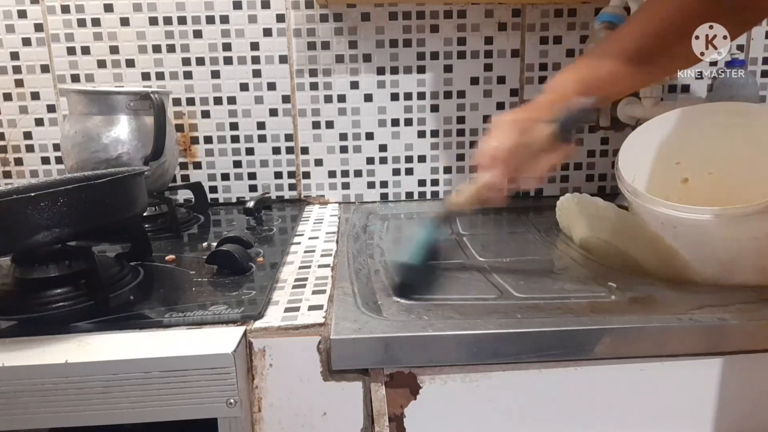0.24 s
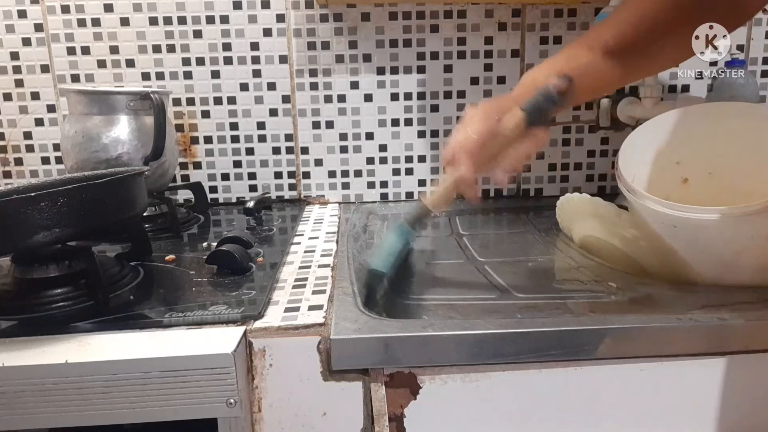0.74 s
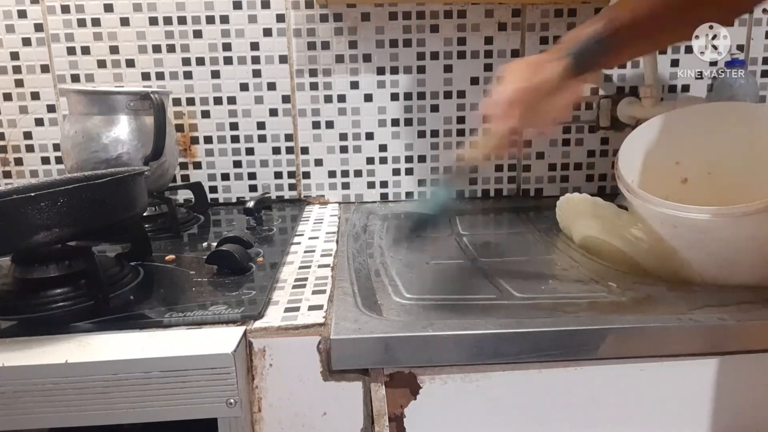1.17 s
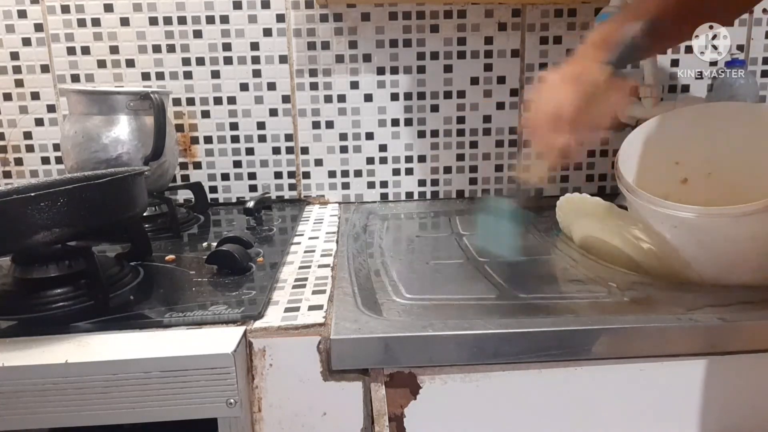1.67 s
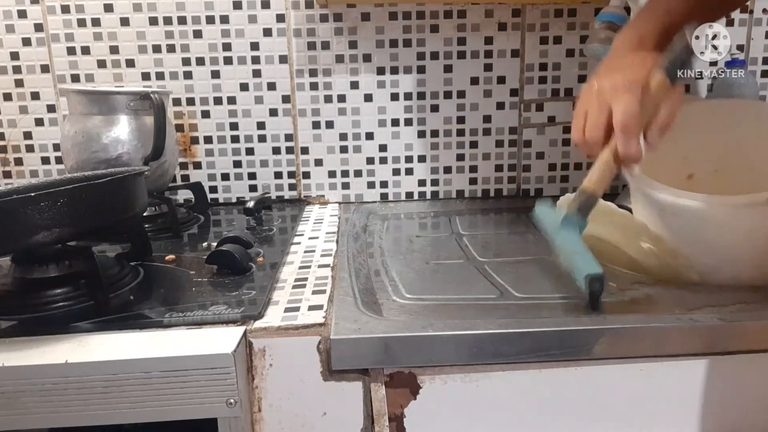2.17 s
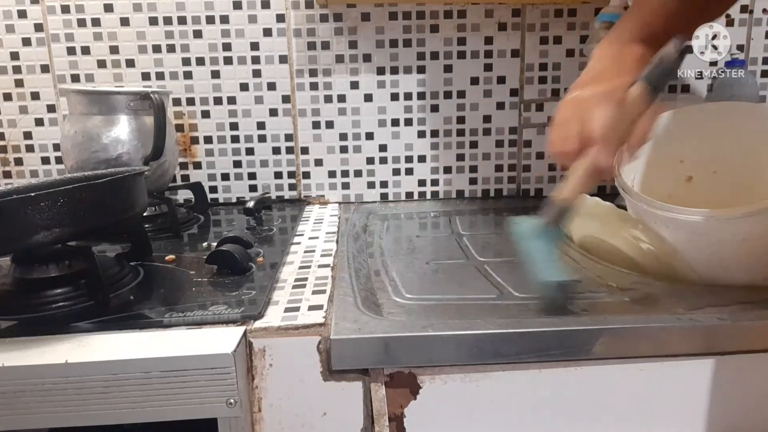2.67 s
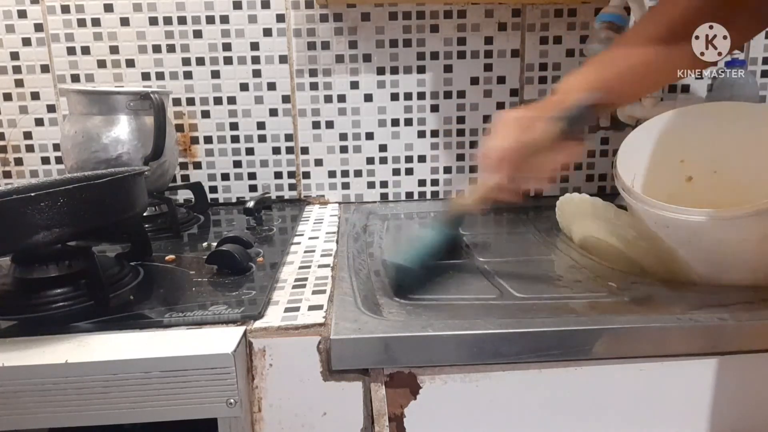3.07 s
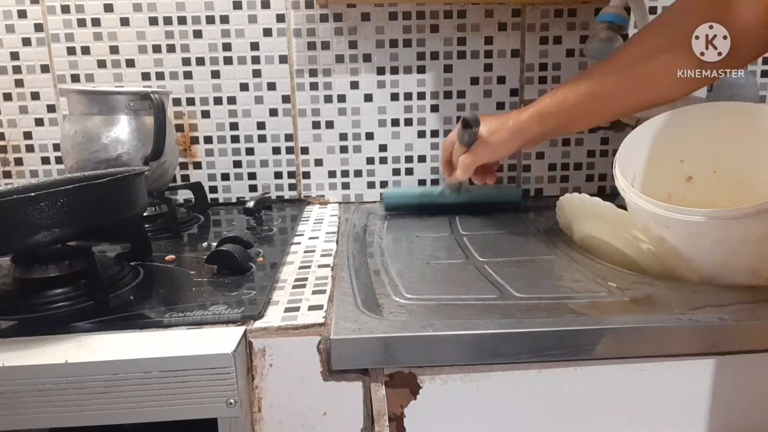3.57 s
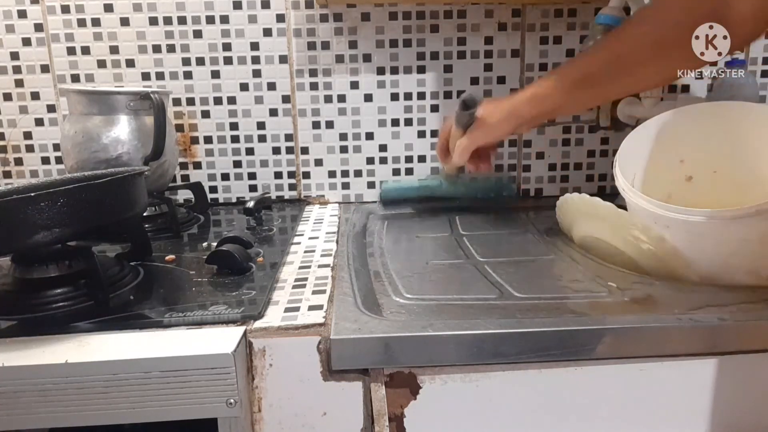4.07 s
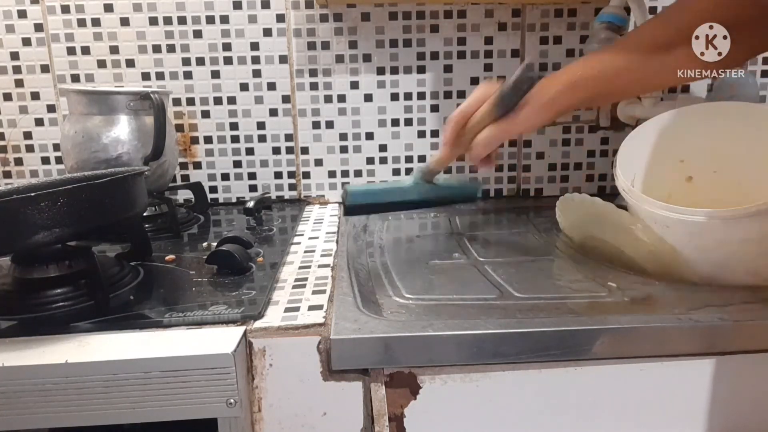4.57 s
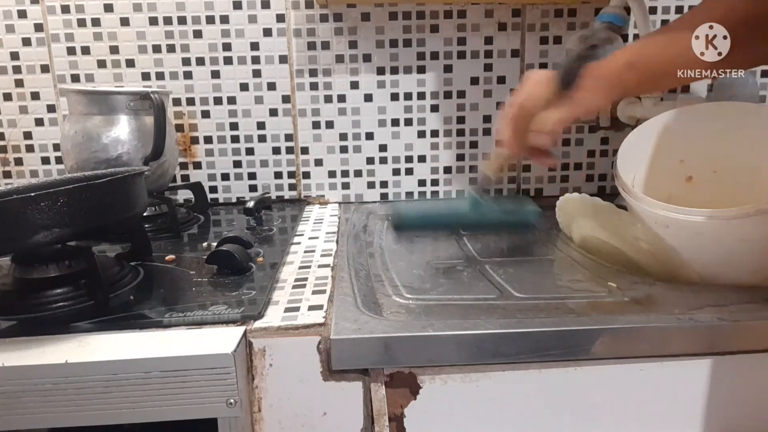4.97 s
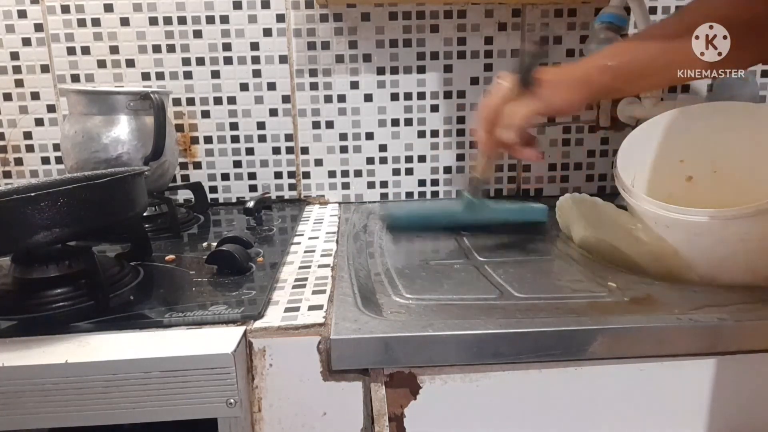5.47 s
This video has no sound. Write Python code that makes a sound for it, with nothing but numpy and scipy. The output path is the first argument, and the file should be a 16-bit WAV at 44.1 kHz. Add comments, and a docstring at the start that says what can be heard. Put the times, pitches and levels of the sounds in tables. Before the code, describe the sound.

A rubber squeegee works over a wet steel drainboard, close to a stereo microphone in a small tiled kitchen with faint hiss. Fizzing water swishes and grainy judder follow each stroke. Short rubbery squeals fall near 0.4, 1.0, 1.6, 2.1 and 2.7 seconds, mostly going from a nasal low note to a higher one, then breaking raggedly and dying away. Soft dull knocks and a low wavering boom of the sheet sit beneath. Small splashes and single chirps join from about 1.4 seconds; a cluster of thuds and heavy shudder comes at 2.3. After a lighter moment around 3, hard bright clacks strike at 3.55 and 3.65, again near 4.2, and at 5.25, with brief metallic ring and short tile echoes. A quick high chirp and strong swish come at 4.75, low rough chirps at 5.3, and a last double knock near 5.7.

```python
"""A rubber squeegee is swept in quick strokes over a wet steel drainboard in a tiled kitchen.
Over a faint room hiss the blade swishes through the water and judders from the start: filtered noise and clicks.
Soft knocks come first, as short damped blows with ringing steel modes, then five gliding stick-slip squeals
above a soft low boom. Splashes and single chirps join from about 1.5 s, and the hardest knocks fall after
3.5 s. Random decaying echoes from the tiles answer the knocks and squeaks."""
import sys
import numpy as np
from scipy import signal
from scipy.fft import rfft, irfft
from scipy.io import wavfile

SR = 44100
rng = np.random.default_rng(int(sys.argv[2]) if len(sys.argv) > 2 else 0)


def unload_wav(signal):
    """Save mono or channel-first audio to the path in sys.argv[1] as 16-bit WAV at rate SR, clipped to [-1, 1]."""
    wavfile.write(
        sys.argv[1],
        SR,
        np.round(np.clip(np.atleast_2d(signal).T, -1, 1) * 32767).astype(np.int16),
    )


N = 253134
TIME = np.arange(N) / SR
EDGE_HZ = 15700  # upper band limit

# likeness of the two channels: (frequency [Hz], likeness [-1 to 1, negative counts as 0])
CHANNEL_LIKENESS = [(100, 0.5), (500, 0.92), (1500, -0.97), (5000, -0.85), (12000, -0.26)]
# strokes of the blade, out and back:
# (fastest [s], speeding up [s], slowing down [s], relative swish level [dB], relative judder level [dB])
STROKES = [ (.02, .2, .25, -74.5, -75), (.405, 0.23, 0.2, -50.5, -39.5), (1.005, .26, 0.16, -51.5, -44.5),
           (1.15, 0.054, 0.14, -64.5, -71), (1.588, 0.23, .2, -49.5, -41.5), (1.723, .12, 0.17, -45, -60.5),
           (1.995, .2, 0.24, -45, -55), (2.135, .15, 0.33, -51, -40), (2.707, 0.19, .14, -53, -38),
           (3.195, .38, 0.14, -55.5, -47), (3.825, .3, 0.14, -51, -44), (4.367, 0.33, 0.26, -50, -43.5),
           (4.66, .3, 0.6, -59.5, -77), (4.776, .045, 0.15, -36.5, -36.5), (4.997, .2, 0.19, -49.5, -65),
           (5.235, .11, 0.26, -51.5, -60.5), (5.41, .25, 0.22, -52, -40.5), (5.538, .15, 0.19, -53.5, -90),
           (5.74, .1, .1, -57, -57)]
# the hand leans on the blade, the sheet flexes and the rubber shudders:
# (time [s], boom level [dB], relative judder level [dB])
FLEXES = [(0.283, -69, -50), (.838, -51.5, -44), (1.442, -56.5, -35.5), (1.905, -52, -53),
          (1.988, -52, -33.5), (2.2, -46.5, -33), (2.3, -51, -25.5), (2.36, -44, -30), (2.568, -49, -33.5),
          (3.039, -55.5, -50), (3.109, -83, -44), (3.256, -54, -53.5), (4.685, -50.5, -30.5),
          (4.73, -68, -34), (4.882, -64.5, -43.5), (4.955, -61.5, -63), (5.675, -54.5, -44.5)]


def amp(db):
    """Decibels to gain."""
    return 10 ** (np.asarray(db) / 20)


def unit(x):
    """Scales to rms 1."""
    return x / np.sqrt(np.mean(x ** 2) + 1e-20)


def read(points, hz):
    """Reads a table on a log-frequency axis."""
    f, value = np.transpose(points)
    return np.interp(np.log(hz + 1), np.log(f + 1), value)


def add(mix, s, sound):
    """Lays a sound into the mix at time s."""
    part = mix[max(round(s * SR), 0):][:len(sound)]
    part += sound[:len(part)]


def colour(x, points):
    """Filters by a table of (frequency [Hz], gain [dB])."""
    gain = amp(read(points, np.fft.rfftfreq(N, 1 / SR)))
    return irfft(rfft(x) * gain, N)


def wander(rate_hz):
    """Smooth random drift of rms 1, with little movement above the given rate."""
    hz = np.fft.rfftfreq(N, 1 / SR)
    lowpass = 1 / (1 + (hz / rate_hz) ** 4)
    return unit(irfft(rfft(rng.standard_normal(N)) * lowpass, N))


def pair(x):
    """Blends two unrelated signals into a left and right that agree most near 500 Hz and not in the treble."""
    a, b = rfft(x)
    same = np.clip(read(CHANNEL_LIKENESS, np.fft.rfftfreq(N, 1 / SR)), 0, 1)
    mid = a * np.sqrt((1 + same) / 2)
    side = b * np.sqrt((1 - same) / 2)
    return irfft(np.array([mid + side, mid - side]), N)


def grains(per_s, spread_db):
    """Two trains of random clicks; positive spread makes a few larger, negative a few smaller."""
    size = amp(spread_db * np.minimum(rng.exponential(1, (2, N)), 4))
    signed = size * rng.choice([-1, 1], (2, N))
    return unit(signed * (rng.random((2, N)) < per_s / SR))


def quiet_room(level_db=-73):
    """The faint hiss of a quiet room is steady noise, strongest in the bass."""
    # room spectrum: (frequency [Hz], relative level [dB per Hz])
    room_spectrum = [(20, -11.5), (85, 6.5), (200, -3.5), (450, -3.5), (1200, -15), (5000, -27.5),
                     (15000, -19)]
    return amp(level_db) * unit(colour(pair(rng.standard_normal((2, N))), room_spectrum))


def speed(fastest, rise_s, fall_s, drop_db=-25, shape=1.24):
    """The blade speeds up and slows down again: 1 at its fastest, drop_db at rise_s before and fall_s after."""
    away = np.maximum((fastest - TIME) / rise_s, (TIME - fastest) / fall_s)
    return amp(drop_db * np.minimum(away, 4) ** shape)  # shape above 1 rounds the top


def burst(s, rise_s, fade_db_per_s):
    """A quick rise at time s and a steady fade in decibels."""
    age = np.maximum(TIME - s, 0)
    return np.minimum(age / rise_s, 1) * amp(-np.minimum(fade_db_per_s * age, 200))


def water_level():
    """The film hisses with the blade's speed, and splashes where the blade lands."""
    # the blade slaps into the water film: (time [s], relative level [dB])
    splash_table = [(1.433, -58), (2.295, -44.5), (2.573, -53), (3.036, -72), (3.547, -84.5),
                    (3.639, -47.5), (4.135, -52.5), (5.258, -47.5), (5.674, -64)]
    parts = [amp(db) * speed(s, rise, fall) for s, rise, fall, db, _ in STROKES]
    parts += [amp(db) * burst(s, rise_s=0.0027, fade_db_per_s=148) for s, db in splash_table]
    return np.sqrt(sum(part ** 2 for part in parts))


def swish(level_db=-1, flutter_db=1, fizz=0.55):
    """The water film tears ahead of the blade in a fizz of tiny bursts."""
    # spectrum of the swish: (frequency [Hz], relative level [dB per Hz])
    swish_spectrum = [(410, -44), (700, -15.5), (945, -11), (1150, -11), (2510, -4.5), (3530, -3),
                      (4760, -3.5), (7130, -3), (8790, -10.5), (13000, -5), (15800, -16.5)]
    film = rng.standard_normal((2, N)) + fizz * grains(per_s=3100, spread_db=2.5)
    film = colour(pair(film), swish_spectrum)
    # the treble of the mid signal sets the reference level
    highpass = signal.butter(4, 5500, "high", fs=SR, output="sos")
    treble = signal.sosfilt(highpass, film.mean(0))
    return film / treble.std() * water_level() * amp(level_db + flutter_db * wander(rate_hz=25))


def sheet_ring():
    """The steel's answer to one blow, with energy 1; neighbouring modes swing in opposite senses."""
    # modes of the drainboard: (frequency [Hz], relative level [dB], t60 [s])
    sheet_modes = [(122, -8.5, 0.18), (160, 0, 0.16), (242, 2, 0.017), (333.1, -14.5, .1),
                   (379.3, -6.5, 0.083), (466, 0.5, 0.14), (508, -2, .1), (602, 5.5, .2), (837, 2.5, .1),
                   (1053, -1.5, 0.19), (1252, -6, 0.061), (1516, -4, .08), (1800, -0.5, .08),
                   (1940, -5.5, 0.13)]
    t = np.arange(SR // 3) / SR
    ring = np.zeros(len(t))
    for k, (hz, db, t60) in enumerate(sheet_modes):
        ring += (-1) ** k * amp(db - 60 * t / t60) * np.cos(2 * np.pi * hz * t)
    return ring / np.linalg.norm(ring)


def drag_level(power=2.1):
    """The rubber drags hardest at the height of a stroke, and shudders when it is leant on."""
    # the power makes judder grow more steeply with speed than the swish does
    parts = [amp(db) * speed(s, rise, fall) ** power for s, rise, fall, _, db in STROKES]
    parts += [amp(db) * burst(s, rise_s=0.009, fade_db_per_s=298) for s, _, db in FLEXES]
    return np.sqrt(sum(part ** 2 for part in parts))


def judder(ring, level_db=-2, sheet_share=.45):
    """The dragging rubber lets go in uneven slips that shake the steel."""
    # spectrum of the slips: (frequency [Hz], relative level [dB per Hz])
    slip_spectrum = [(50, -36), (150, -4), (240, 1), (420, 1), (620, -5.5), (1100, -12), (1800, -14.5),
                     (3600, -15), (6500, -24), (12000, -60)]
    slips = pair(grains(per_s=450, spread_db=-1.0) + 0.31 * rng.standard_normal((2, N)))
    slips = unit(colour(slips, slip_spectrum)) * drag_level()
    rung = signal.oaconvolve(slips, ring[None], axes=1)[:, :N]
    return amp(level_db) * (slips + sheet_share * rung * slips.std() / rung.std())


def knocks(ring, cycles=0.29, rubber_hz=370, ring_db=-9, crack_db=-22, crack_s=0.0053, crack_reach=3):
    """Each blow is a brief damped contact with a wet crack, then the sheet rings on."""
    # blade and frame hit the steel; soft rubber sounds low and hard plastic high:
    # (time [s], peak level of the blow [dB], pitch of the blow [Hz], share of sheet ring [0-1])
    blow_table = [ (.195, -47, 1120, 1), (.599, -53, 6000, .1), (1.0, -33, 330, 1), (1.590, -30, 326, 0.32),
                  (1.992, -28.5, 1110, 1), (2.122, -31.5, 350, .6), (2.204, -26, 352, 1),
                  (2.2985, -20, 2950, 1), (2.304, -20, 377, 1), (2.315, -26.5, 420, 1),
                  (2.358, -27, 1670, 0.28), (2.577, -27, 2800, .95), (2.697, -31.5, 400, 0.51),
                  (3.116, -42.5, 418, 1), (3.5478, -17.5, 816, .41), (3.6392, -12, 3400, 0.13),
                  (3.7058, -27, 790, .17), (3.809, -25.5, 700, .24), (4.1432, -26, 2100, .6),
                  (4.1963, -22, 750, .5), (4.1988, -18, 3200, .1), (4.2424, -15.5, 780, .5),
                  (4.318, -27, 350, 1), (4.6881, -22, 700, 1), (4.733, -22, 543, 0.5),
                  (5.2557, -21.5, 820, 0.28), (5.2583, -10.5, 3150, 0.056), (5.397, -28, 620, .46),
                  (5.6743, -21, 770, 0.64), (5.6755, -22, 3300, 0.46)]
    out, t = np.zeros(N), np.arange(len(ring)) / SR
    for s, db, hz, share in blow_table:
        contact_s = cycles / hz * (1 + (rubber_hz / hz) ** 2)  # soft rubber shudders for longer
        push = np.sin(2 * np.pi * hz * t) * t * np.exp(-t / contact_s)
        blow = -np.gradient(push)  # the air hears the change of the push
        blow /= abs(blow).max()
        # a soft blow reaches only the lower modes and throws a duller spray
        top_hz = min(crack_reach * hz, SR / 2 / np.pi)
        band = signal.butter(2, [hz / 2, top_hz], "band", fs=SR, output="sos")
        spray = unit(signal.sosfilt(band, rng.standard_normal(len(t))))
        crack = amp(crack_db) * spray * np.exp(-t / crack_s)
        rung = signal.lfilter(*signal.butter(2, hz, fs=SR), ring) / abs(ring).max()
        add(out, s, amp(db) * (blow + crack + share * amp(ring_db) * rung))
    return out


def kitchen(x, count=800, slot=20):
    """Dense random echoes off the tiles, different for each channel, each band dying at its own pace."""
    # reverberation: (frequency [Hz], t60 [s])
    tile_decay = [(100, .3), (600, .22), (2500, .26), (14000, .19)]
    taps = np.zeros((2, count * slot))
    at = np.arange(count) * slot + rng.integers(0, slot, (2, count))  # one echo in each slot of samples
    np.put_along_axis(taps, at, rng.choice([-1., 1.], at.shape), 1)
    hz, t, z = signal.stft(taps, SR, nperseg=256)
    same = np.clip(read(CHANNEL_LIKENESS, hz), 0, 1)[:, None] ** 2
    z[1] = same * z[0] + np.sqrt(1 - same ** 2) * z[1]
    decay = amp(-60 * t / read(tile_decay, hz)[:, None])
    tail = signal.istft(z * decay, SR, nperseg=256)[1]
    tail = np.pad(tail / np.linalg.norm(tail[0]), ((0, 0), (60, 0)))  # 60 samples of pre-delay
    return signal.fftconvolve(x[None], tail, axes=1)[:, :N]


def squeaks(jitter=.08, shimmer_db=4, swell=1.224, rasp_db=-11, chirp_rise_share=.33):
    """The lip sticks and slips at its own pitch; over a rib the cycle turns ragged."""
    # A sideways stroke squeals in four stages: low note, rising high note, ragged break on a rib, dying tail.
    # (meets the rib [s], low note's lead [s], its build-up [s], its level [dB],
    #  high note's build-up [s], its pitch [Hz], its level [dB], its octave over fundamental [dB],
    #  break's level [dB], tail's pitch [Hz], its level [dB])
    squeal_table = [ (.366, .028, .056, -22, .03, 1082, -45, -10, -34.5, 982, -45.5),
                    (.970, .016, .045, -45.5, .072, 1058, -25, 5.5, -27.5, 992, -34.5),
                    (1.556, .02, 0.027, -49.5, 0.054, 1136, -25, 0, -34, 1164, -61),
                    (2.095, .04, .024, -36, .028, 1056, -22.5, 14, -32.5, 1050, -34),
                    (2.685, 0.062, .028, -40.5, .026, 1106, -32, -0.5, -34.5, 1190, -61)]
    # single chirps of the lip: (loudest [s], length [s], pitch when loudest [Hz], glide [Hz per s],
    #  level [dB], octave over fundamental [dB], roughness [0-1])
    chirp_table = [ (1.482, .055, 630, 2500, -31, -22, .55), (1.858, .06, 4850, 1000, -54, -35, .5),
                   (2.322, .04, 1900, -1500, -36, -25, .7), (3.18, .055, 620, -1400, -42, -25, .35),
                   (3.668, .048, 616, -1200, -28, -22, .25), (3.765, .048, 720, -150, -34, -22, .3),
                   (4.243, .09, 780, -3500, -34.5, -15, .95), (4.762, .14, 505, -80, -37, -14, .4),
                   (4.746, .02, 4210, 16000, -21.5, -34, .08), (4.765, .055, 4510, -2400, -37, -21, .6),
                   (4.772, .06, 1930, 0, -41, -20, .15), (5.276, .052, 618, -480, -24, -7, .3),
                   (5.322, .13, 612, -500, -40, -5, .75)]
    # how strongly the lip sounds higher overtones: (frequency [Hz], relative level [dB])
    lip_response = [(1800, -23), (2400, -17), (3300, -21), (4400, -37), (8000, -48)]
    drift, flutter = wander(rate_hz=223), wander(rate_hz=160)
    rasp_spectrum = [(150, -29.5), (900, -3.0), (1600, -11), (2400, -8.5), (7000, -34)]
    rasp = unit(colour(rng.standard_normal(N), rasp_spectrum))

    def note(loudest, rise_s, fall_s, pitch_hz, glide, db, octave_db, rough):
        """One gliding stick-slip note: its start time and its sound."""
        start, end = loudest - rise_s, loudest + fall_s
        span = (TIME >= start) & (TIME < end)
        t = TIME[span]
        hz = (pitch_hz + glide * (t - loudest)) * (1 + jitter * rough * drift[span])
        phase = 2 * np.pi * np.cumsum(hz) / SR
        tone = unit(np.sin(phase) + amp(octave_db) * np.sin(2 * phase))
        # up to 0 dB, a stronger octave means a sharper slip and brighter overtones
        for k in range(3, 7):
            overtone_db = read(lip_response, k * pitch_hz) + min(octave_db, 0) / 5 - 3 * (k - 3)
            tone += (k * pitch_hz < EDGE_HZ) * amp(overtone_db) * np.sin(k * phase)
        tone += rough * amp(rasp_db) * rasp[span]
        ramp = np.interp(t, [start, loudest, end], [0, 1, 0])
        grip = np.sin(np.pi / 2 * ramp ** swell) ** 2
        return start, amp(db + shimmer_db * rough * flutter[span]) * grip * tone

    out = np.zeros(N)
    for (rib, lead_s, low_rise_s, low_db, build_s, high_hz, high_db, octave_db,
         break_db, tail_hz, tail_db) in squeal_table:
        add(out, *note(rib - lead_s, low_rise_s, fall_s=.068, pitch_hz=609.7, glide=190,
                       db=low_db, octave_db=-20.5, rough=.11))
        add(out, *note(rib - .004, build_s, fall_s=.012, pitch_hz=high_hz, glide=650,
                       db=high_db, octave_db=octave_db, rough=.07))
        add(out, *note(rib + .012, rise_s=.017, fall_s=.049, pitch_hz=1136, glide=350,
                       db=break_db, octave_db=-4, rough=.52))
        add(out, *note(rib + .064, rise_s=.04, fall_s=.05, pitch_hz=tail_hz, glide=0,
                       db=tail_db, octave_db=-17, rough=.39))
    for loudest, length, *voice in chirp_table:
        add(out, *note(loudest, chirp_rise_share * length, (1 - chirp_rise_share) * length, *voice))
    return out


def off_axis(x, lead_s=.00003):
    """A sound from one side reaches the left microphone first."""
    delay = np.exp(-2j * np.pi * np.fft.rfftfreq(N, 1 / SR) * lead_s)
    return np.array([x, irfft(rfft(x) * delay, N)])


def boom(hz=90, rise_s=0.022, waver=0.093):
    """Under the hand's load the whole sheet swings in a low, wavering tone."""
    load = np.zeros(N)
    for s, db, _ in FLEXES:
        age = TIME / rise_s
        add(load, s, amp(db) * age * np.exp(1 - age))
    swing_hz = hz * (1 + waver * wander(rate_hz=20))
    return load * unit(np.sin(2 * np.pi * np.cumsum(swing_hz) / SR))


def light_rub(at_s=0.677, rise_s=0.033, fall_s=0.171, level_db=-55):
    """A faint, dry brush of the blade between two strokes: a swell of filtered noise."""
    rub_spectrum = [(1200, -39.0), (3600, -7.0), (9000, -18)]
    hiss = colour(pair(rng.standard_normal((2, N))), rub_spectrum)
    return amp(level_db) * unit(hiss) * speed(at_s, rise_s, fall_s)


def scene(squeak_wet_db=-9, knock_wet_db=-2):
    """Blade, water and steel over the faint hiss of a quiet room."""
    ring = sheet_ring()
    squeal, blows = squeaks(), knocks(ring)
    echoes = kitchen(amp(squeak_wet_db) * squeal + amp(knock_wet_db) * blows)
    water = swish() + light_rub()
    steel = judder(ring) + boom()
    return quiet_room() + water + steel + blows + echoes + off_axis(squeal)


def record(dry):
    """The two microphones differ in colour; then the band limit."""
    # channel balance: (frequency [Hz], left over right [dB])
    channel_balance = [(90, 8.5), (250, 3.5), (600, 4), (1500, 4), (4500, 3.5), (8500, 0), (12500, -6)]
    left = colour(dry[0], [(hz, db / 2) for hz, db in channel_balance])
    right = colour(dry[1], [(hz, -db / 2) for hz, db in channel_balance])
    edge = signal.firwin(511, EDGE_HZ, window=("kaiser", 9), fs=SR)
    return signal.oaconvolve(np.array([left, right]), edge[None], "same", axes=1)


dry = scene()
out = record(dry)
unload_wav(out)
```